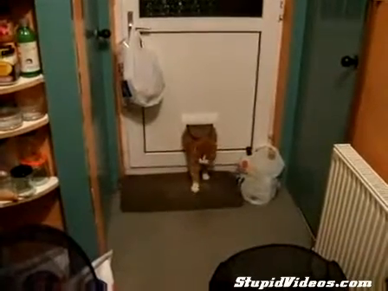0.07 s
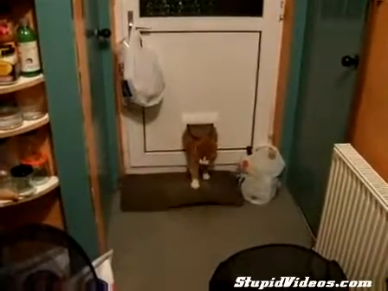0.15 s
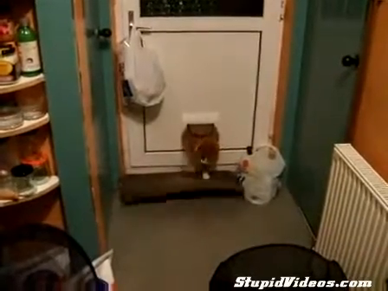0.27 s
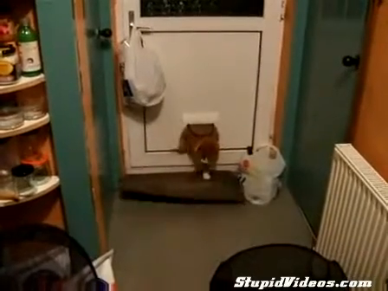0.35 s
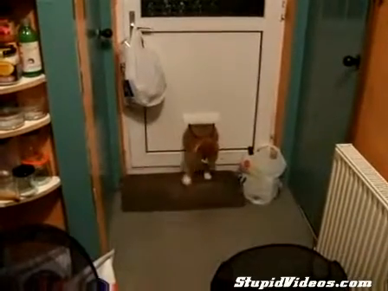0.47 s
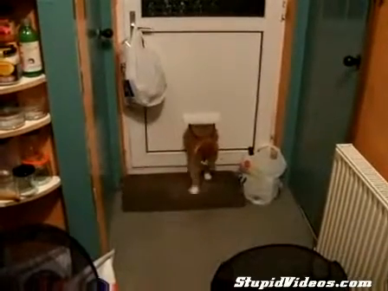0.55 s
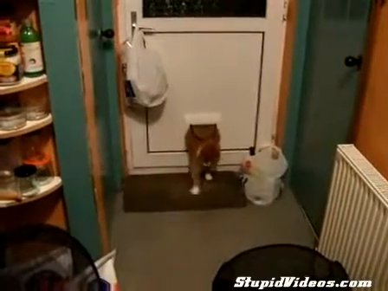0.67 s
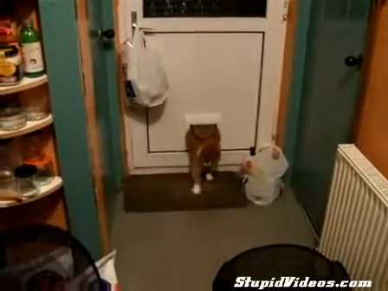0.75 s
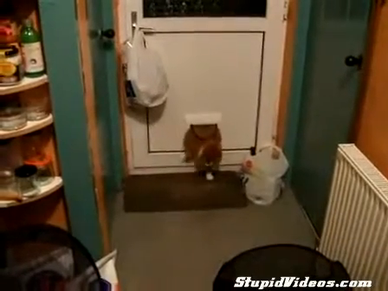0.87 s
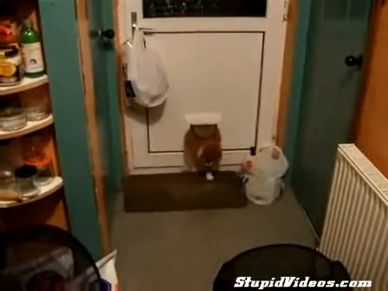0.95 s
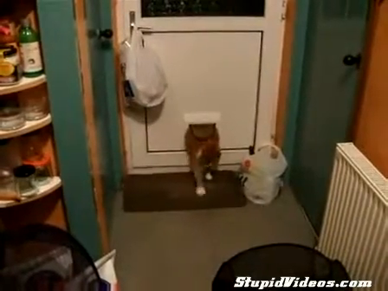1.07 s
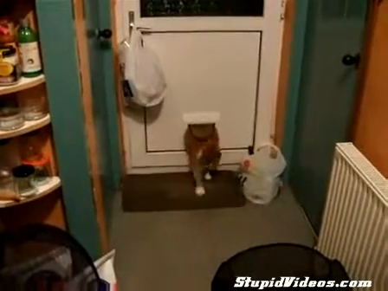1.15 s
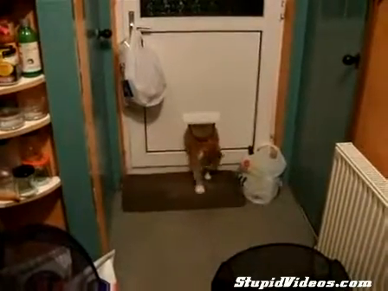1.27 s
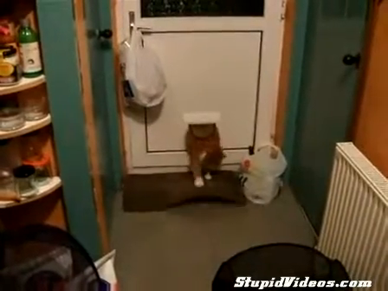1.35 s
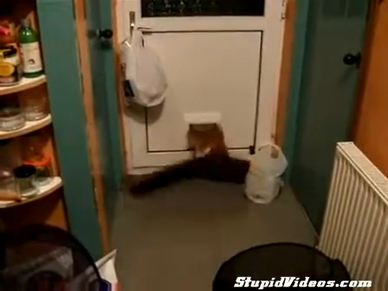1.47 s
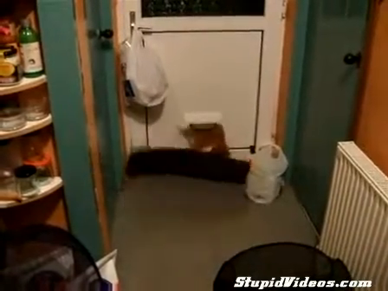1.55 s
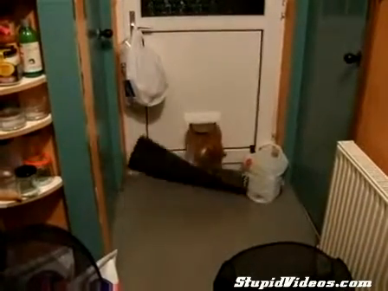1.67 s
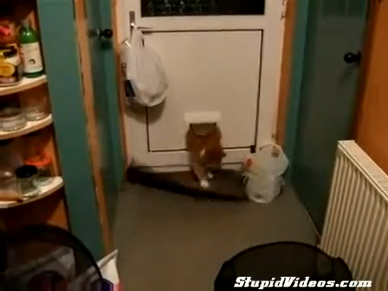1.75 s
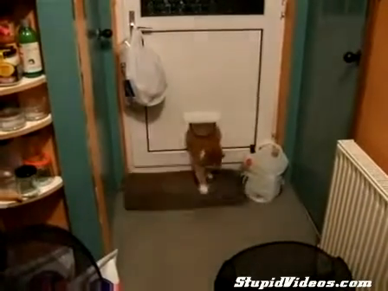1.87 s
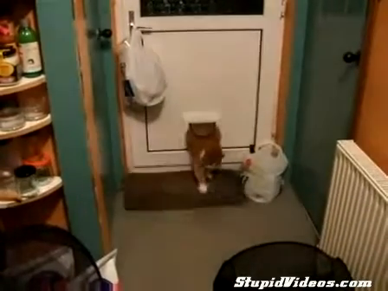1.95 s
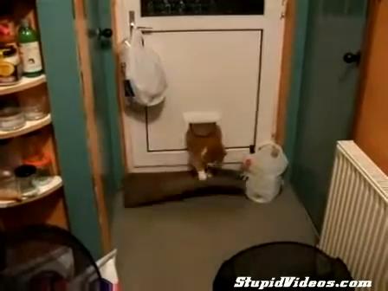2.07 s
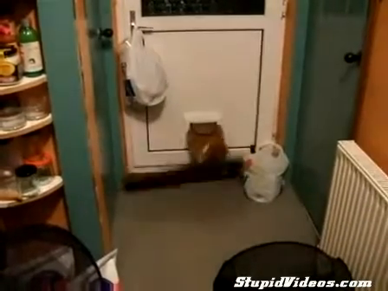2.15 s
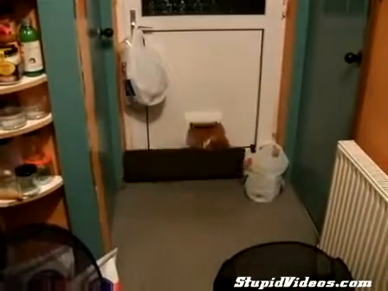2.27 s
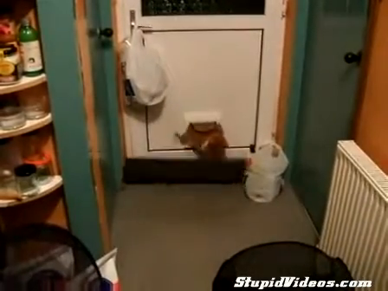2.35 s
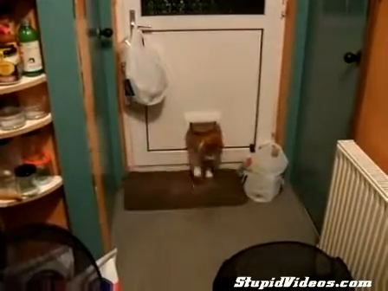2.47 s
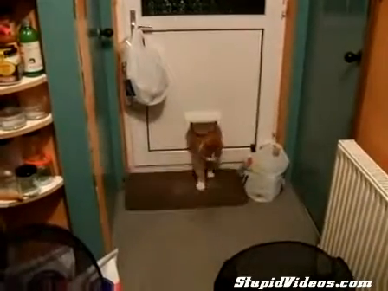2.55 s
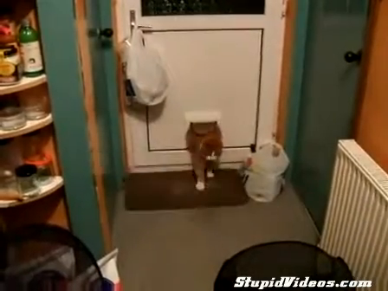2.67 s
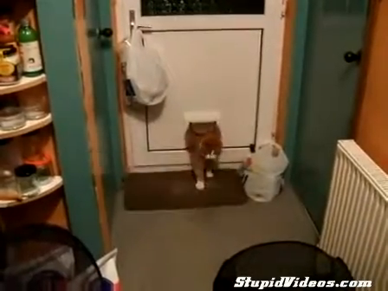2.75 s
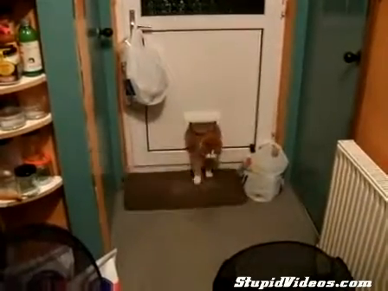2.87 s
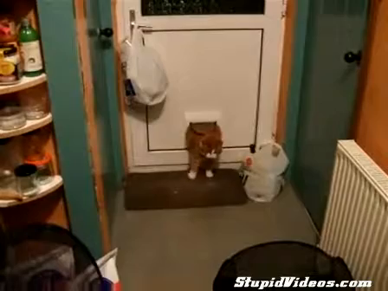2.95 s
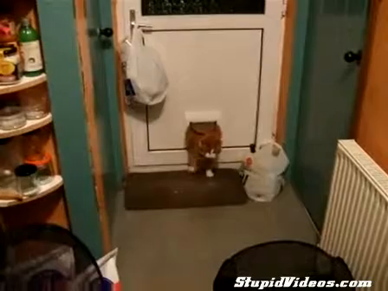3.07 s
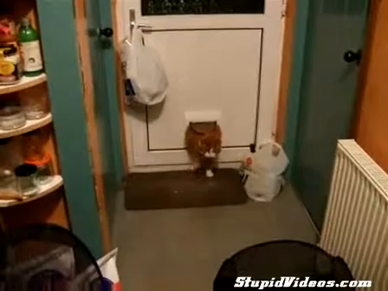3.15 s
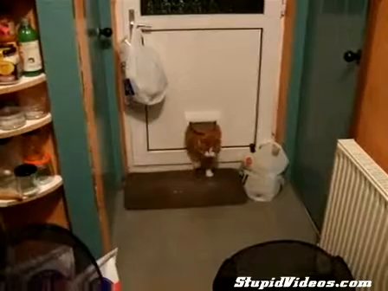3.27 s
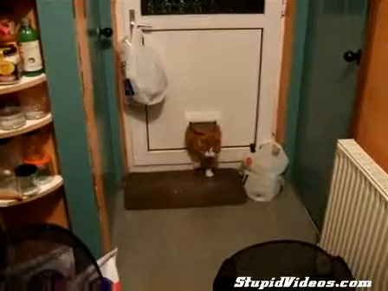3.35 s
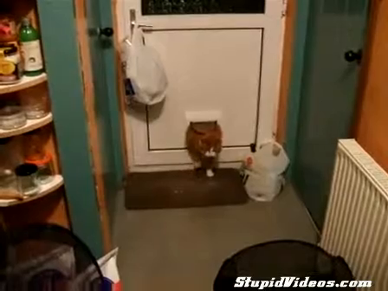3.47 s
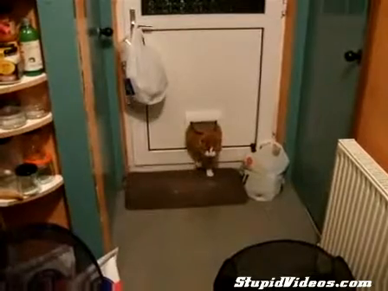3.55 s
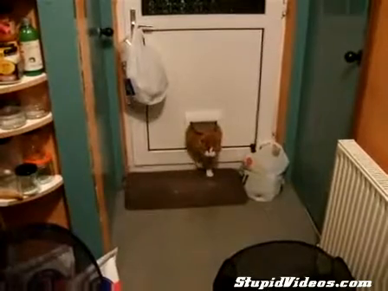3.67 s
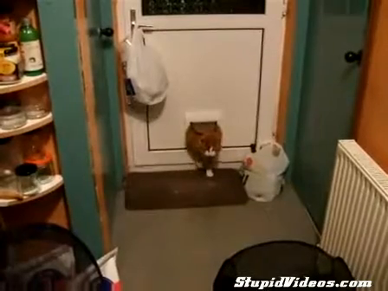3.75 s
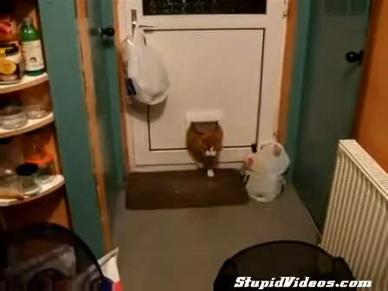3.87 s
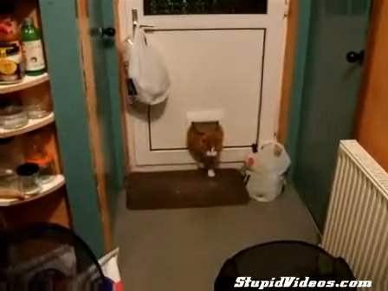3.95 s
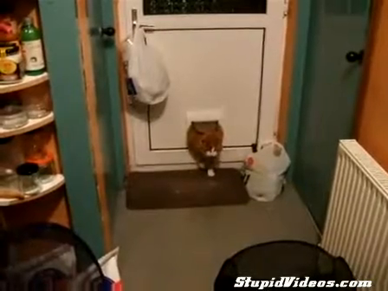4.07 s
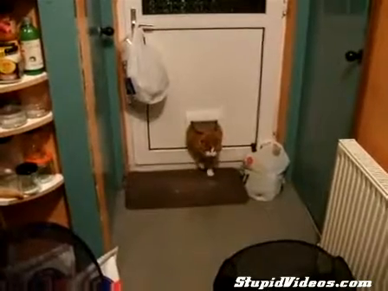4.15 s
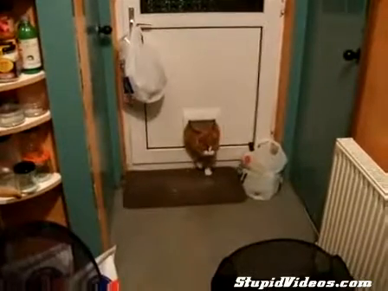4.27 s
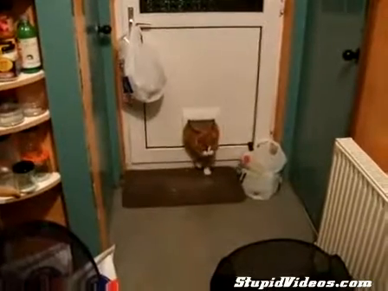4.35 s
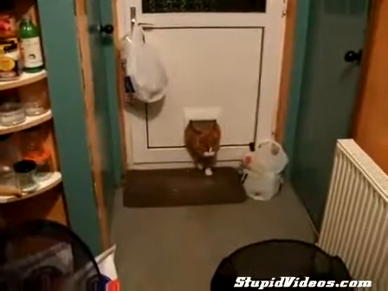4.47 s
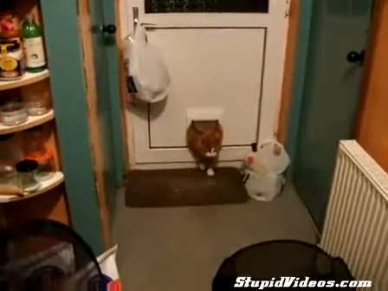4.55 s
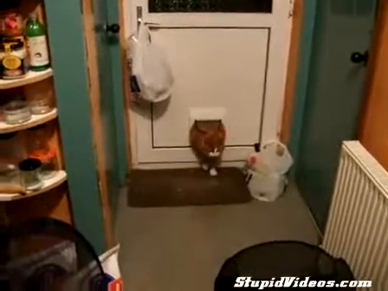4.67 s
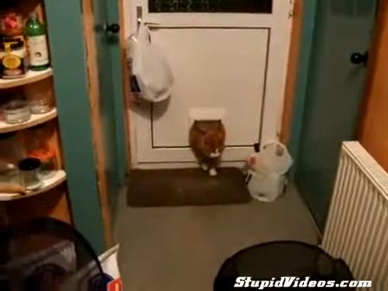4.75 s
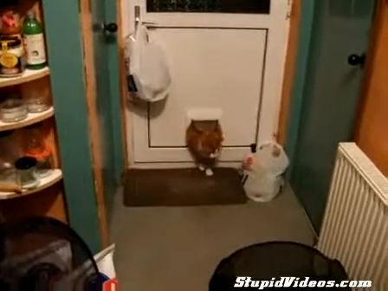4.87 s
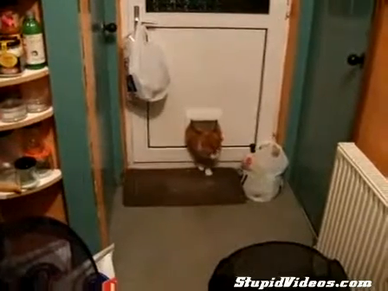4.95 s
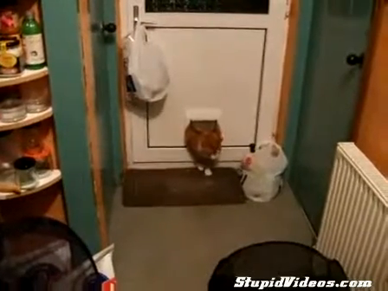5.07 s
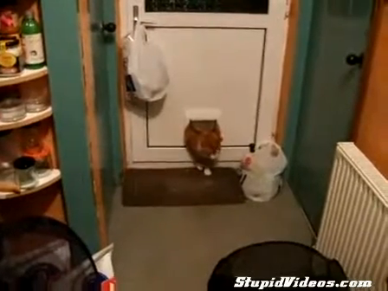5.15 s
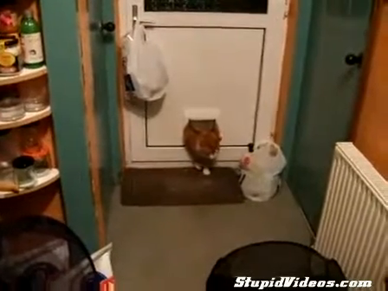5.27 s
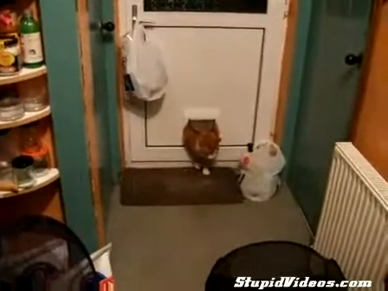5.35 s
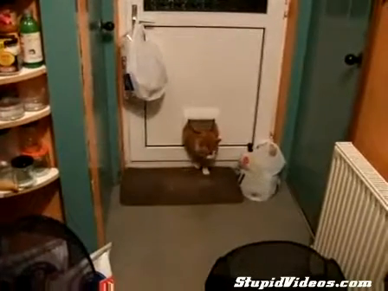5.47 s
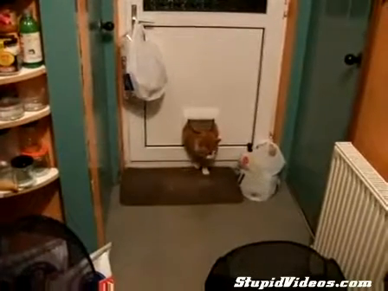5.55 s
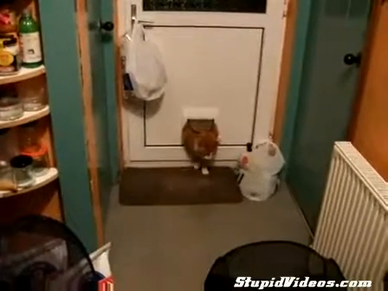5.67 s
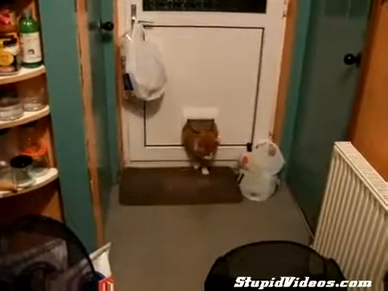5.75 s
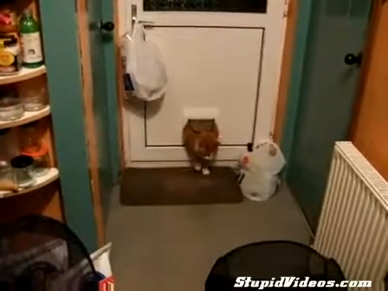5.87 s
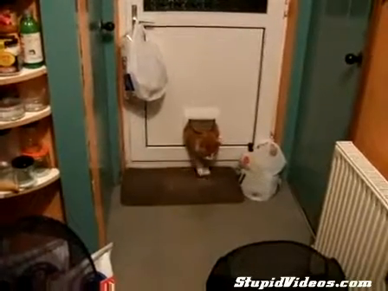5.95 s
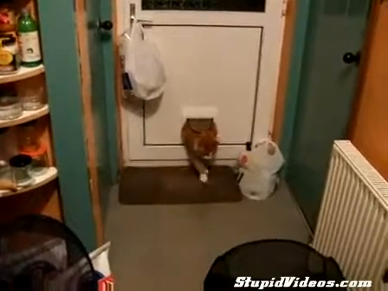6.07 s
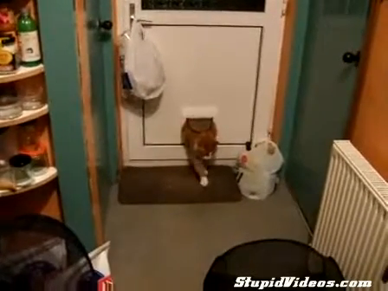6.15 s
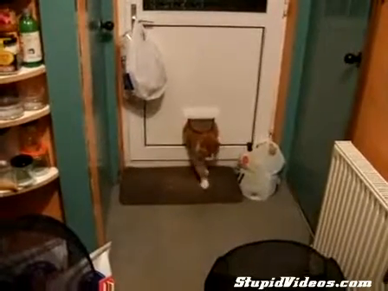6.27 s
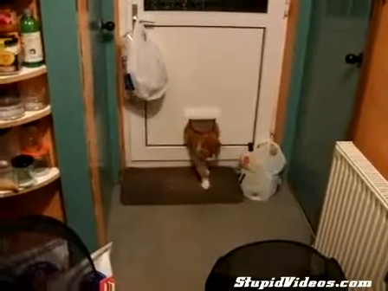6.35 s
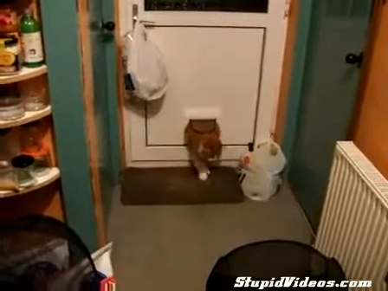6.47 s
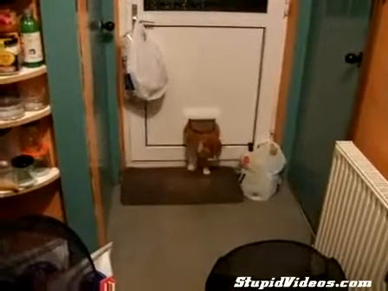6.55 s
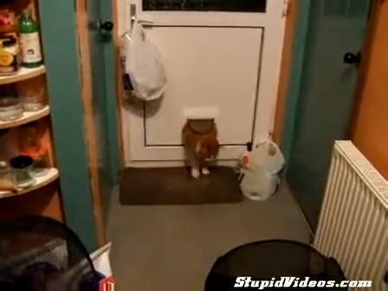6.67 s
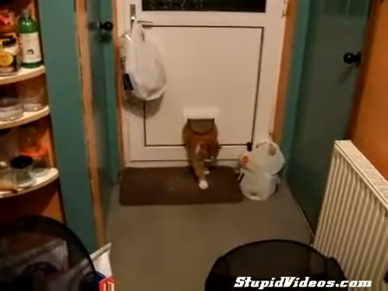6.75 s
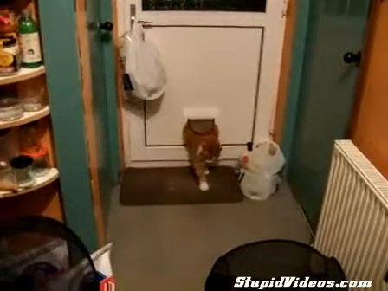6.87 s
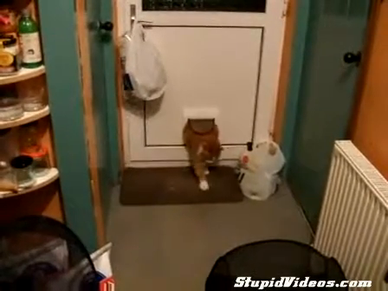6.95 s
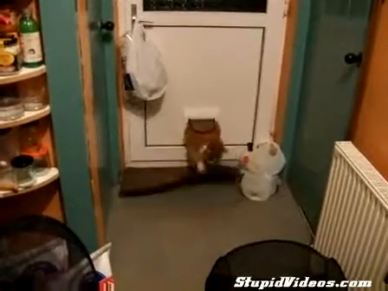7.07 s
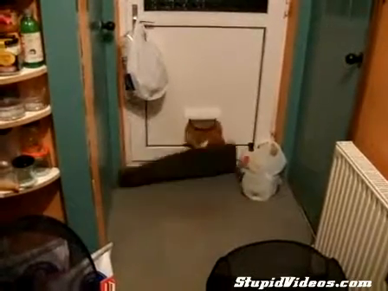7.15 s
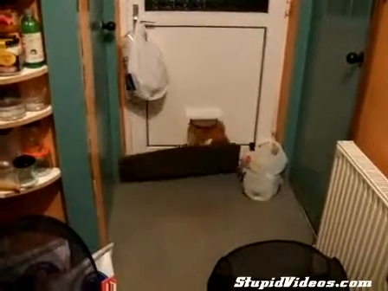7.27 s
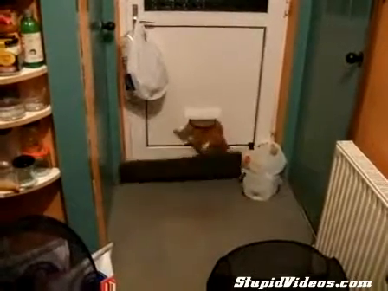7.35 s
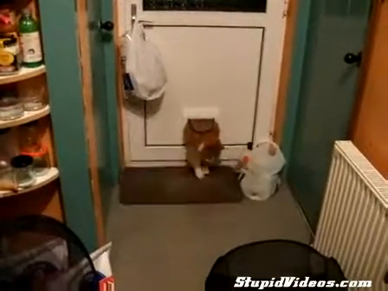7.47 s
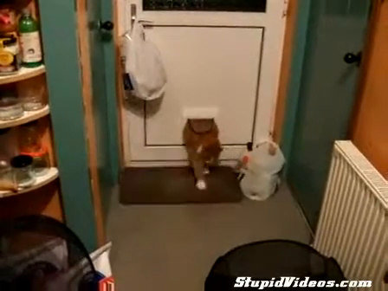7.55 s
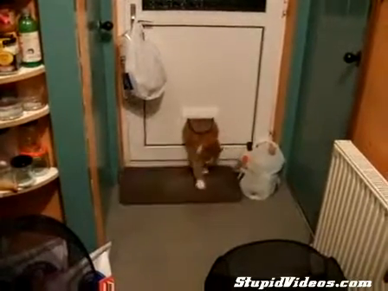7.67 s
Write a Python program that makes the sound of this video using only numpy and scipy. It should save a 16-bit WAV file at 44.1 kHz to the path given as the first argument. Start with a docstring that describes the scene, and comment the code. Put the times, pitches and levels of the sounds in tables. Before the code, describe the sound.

Hollow knocks, claw plucks and gritty scrapes come from a few metres down a narrow hallway as a cat wedged in a door flap pulls at a doormat, which slaps the floor several times. A lull follows, holding only appliance hum, microphone hiss and one faint, falling meow. Then the clawing and knocking return, and the mat lands with a last slap.

```python
"""A heavy cat is wedged in the flap of a back door, a few metres down a narrow hallway.
For three seconds its claws pluck and drag the doormat, which lifts and slaps down, and its body
knocks the flap frame and door; the flap squeaks, and one slap rings a hard part.
In a pause it meows once, faintly, over appliance hum and microphone hiss.
From 6.6 s it struggles again, ending on a last slap of the mat."""
import sys
import numpy as np
from scipy import signal
from scipy.fft import rfft, irfft
from scipy.io import wavfile
from scipy.ndimage import uniform_filter1d

SR = 44100
rng = np.random.default_rng(int(sys.argv[2]) if len(sys.argv) > 2 else 0)


def inscribe(sig):
    """Save sig as 16-bit PCM at rate SR to the path in sys.argv[1].

    A 1-D sig is mono; a 2-D sig holds one channel per row.
    Samples are clipped to [-1, 1] before scaling.
    """
    pcm = np.round(np.clip(np.atleast_2d(sig).T, -1, 1) * 32767)
    wavfile.write(sys.argv[1], SR, pcm.astype(np.int16))


N = 340011
TIME = np.arange(N) / SR
AGE = TIME[:SR // 2]  # seconds since a blow

# Mat landings. Each row: start in seconds, level in dB, weight 0-1, contact in seconds.
SLAPS = [(0.604, -23, .35, 0.0009), (1.816, -20.5, 0, 0.0039), (1.985, -20, 0, 0.0047),
         (2.638, -19, 0.66, 0.0085), (7.635, -20, 0.93, 0.003)]


def plucks():
    """Claws catch the mat and let go."""
    # Each row: start in seconds, level in dB, weight 0-1, hollow pitch in Hz.
    events = [(0.203, -34, 0.67, 690), (0.502, -24.5, .1, 840), (0.557, -25, 0.68, 1180),
              (0.921, -32, 0.85, 720), (0.934, -30, 0.86, 620), (1.037, -32.5, 0.42, 1300),
              (1.404, -41, 0.97, 810), (1.468, -29, 1, 535), (1.67, -22.5, 0.61, 1020),
              (1.692, -23, 0.4, 880), (2.464, -25, .3, 915), (2.974, -41.5, 0.63, 760),
              (6.598, -29.5, .8, 600), (6.621, -28, 0.88, 590), (7.105, -43.5, 0.73, 800),
              (7.349, -31.5, 0.4, 510)]
    # Thump, knock, clack, hiss. Each row: low and high edge in Hz, dB when light, dB added at full weight.
    colour = [(70, 250, -18.5, -5), (410, 704, -21.5, 19.5), (694, 2450, -4.5, -1.5),
              (2530, 10400, -12.5, 2)]
    return hollow_blows(events, colour, contact_s=0.0033, padding_s=0.0008, snap_db=-11.5,
                        hollow_db=2, hollow_q=4, door_db=-3.5, wet_db=2)


def knocks():
    """The cat's body hits the flap frame and door."""
    # Each row: start in seconds, level in dB, weight 0-1, hollow pitch in Hz.
    events = [(0.338, -23, 0.08, 435), (0.361, -26, 0, 413), (0.404, -21.5, 0, 384),
              (0.774, -30, 0.73, 313), (1.186, -22, 0.78, 365), (1.254, -31.5, 0.4, 332),
              (1.732, -21.5, 0.8, 407), (1.755, -24.5, 1, 298), (1.786, -26, 0.34, 306),
              (2.333, -26, 0.75, 300), (2.396, -25, .75, 280), (2.420, -16, .35, 315),
              (4.215, -42.5, .7, 330), (6.858, -28.5, 0.76, 323), (6.937, -30, 0.78, 315),
              (7.287, -18.5, 0.73, 335), (7.441, -13.5, 0.34, 328), (7.539, -20.5, 0.63, 327)]
    # Thump, knock, clack, hiss. Each row: low and high edge in Hz, dB when light, dB added at full weight.
    colour = [(75, 217, -30, 27), (220, 735, -6.5, -0.5), (710, 2500, -11.5, -3.5), (2500, 11000, -13, -14)]
    return hollow_blows(events, colour, contact_s=0.0024, padding_s=0.0014, snap_db=-13.5,
                        hollow_db=9, hollow_q=2.8, door_db=-3, wet_db=0.5)


def slaps(snap_db=-12, door_db=-5, wet_db=-1, crack_db=9, crack_s=0.00088):
    """The mat lands; the longer it takes to roll flat, the softer and duller the attack."""
    # Thump, knock, clack, hiss. Each row: low and high edge in Hz, dB when light, dB added at full weight.
    colour = [(25, 213, -17.5, 9.5), (220, 715, -11.5, 12), (693, 2770, 0, -1.5), (2480, 10200, -3.5, -2.5)]
    out = np.zeros(N)
    for start_s, level_db, weight, contact_s in SLAPS:
        bands = weighted(colour, level_db, weight)
        bands[-1, -1] += crack_db * crack_s / max(contact_s, crack_s)  # brief contact: more hiss
        add(out, start_s, blow(bands, contact_s, snap_db, door(door_db), wet_db))
    return out


def hollow_blows(events, colour, contact_s, padding_s, snap_db, hollow_db, hollow_q, door_db, wet_db):
    """Blows ring the door and a hollow whose pitch moves as the cat shifts; weight lengthens contact."""
    out = np.zeros(N)
    for start_s, level_db, weight, hz in events:
        resonances = door(door_db) + [(hz, hz / hollow_q, hollow_db)]
        bands = weighted(colour, level_db, weight)
        add(out, start_s, blow(bands, contact_s + weight * padding_s, snap_db, resonances, wet_db))
    return out


def blow(bands, contact_s, snap_db, resonances, wet_db):
    """A snap and a short crunch of contact, coloured by what is struck and by the hallway."""
    # Contact spectrum. Each row: frequency in Hz, level in dB.
    spectrum = [(25, -5), (90, -1.5), (165, 2.5), (235, -8), (320, 2), (1150, 0), (2000, -3), (5000, -7.5),
                (7400, -10.5), (8800, -19), (10200, -47.5)]
    push = AGE / max(contact_s, 1 / SR)
    force = grains(len(AGE), 9000, 0.82) * push * np.exp(-push)
    force = force / np.linalg.norm(force)
    force[0] += amp(snap_db)
    struck = through(force, body(spectrum, resonances))
    sound = through(struck, hallway(tail_db=wet_db))
    parts = [(band(sound, lo, hi), db) for lo, hi, db in bands]
    return sum(part * amp(db) / np.std(part[:SR // 30]) for part, db in parts)


def weighted(colour, level_db, weight):
    """Weight shifts a blow towards the bass. Each row out: low and high edge in Hz, level in dB."""
    return np.array([(lo, hi, level_db + light_db + np.clip(weight, 0, 1) * heavy_db)
                     for lo, hi, light_db, heavy_db in colour])


def door(coupling_db):
    """Panel and frame resonances, as strongly as a blow reaches them."""
    # Each row: frequency in Hz, width in Hz, lift in dB.
    modes = [(84, 12.4, 5), (142.5, 8.1, -2), (306, 11, -3), (533, 18, 2), (842, 78, 2), (1100, 71, -0.5),
             (1323, 43, -0.5)]
    return [(hz, width_hz, db + coupling_db) for hz, width_hz, db in modes]


def dragging(hiss_db=-1.5, rumble_db=-1, judder_db=2, swell_db=4.5, skid_rise_s=0.015):
    """The mat's backing sticks and slips over the gritty floor, when pulled and when it lands."""
    # Friction spectra. Each row: frequency in Hz, level in dB.
    hiss_spectrum = [(500, -34), (1200, -14.5), (2400, -5), (3600, -4.5), (7400, -3), (8900, -12),
                     (10200, -40.5)]
    rumble_spectrum = [(30, -20.5), (150, -1.5), (230, -7.5), (330, 0), (620, -7.5), (1050, -4.5),
                       (1700, -23.5), (4000, -44.5)]
    # Each row: start in seconds, length in seconds, level in dB, rumble offset in dB.
    pulls = [(0.33, 0.22, -37.5, -3.5), (1.508, 0.22, -32.5, -2.5), (1.848, 0.092, -36, 0),
             (2.174, 0.43, -33.5, -4), (2.757, 0.26, -52, -7.5), (7.153, 0.49, -33.5, -3.5),
             (7.196, 0.081, -24.5, -3)]
    judder = amp(judder_db * walk(70))
    hiss = through(grains(N, 2500, 0.99) * judder, body(hiss_spectrum))
    rumble = through(grains(N, 2000, 1) * judder, body(rumble_spectrum))
    out = np.zeros(N)
    for start_s, length_s, level_db, bass_db in pulls:
        room = hallway(early_db=-1, tail_db=-2.5)  # new spot, new reflections
        off_centre = np.clip(2 * (TIME - start_s) / length_s - 1, -1, 1)
        speed = stroke(TIME - start_s, length_s) * amp(level_db - swell_db * off_centre ** 2)
        out += speed * amp(hiss_db) * unit(through(hiss, room))
        out += speed * amp(rumble_db + bass_db) * unit(through(rumble, room))
    # A skid around each slap.
    room = hallway(early_db=-2, tail_db=-1)
    for layer, skid_db, decay_s in ((hiss, -7.5, 0.054), (rumble, -9.5, 0.07)):
        speed = 0
        for land_s, level_db, *_ in SLAPS:
            fade = np.maximum((land_s - TIME) / skid_rise_s, (TIME - land_s) / decay_s)
            speed += amp(level_db + skid_db) * np.exp(-fade)
        out += speed * unit(through(layer, room))
    return out


def stroke(age_s, length_s, attack_s=0.041, release_s=0.037):
    """Envelope of a pull: rise, hold, release."""
    return np.clip(age_s / attack_s, 0, 1) ** 2 * np.exp(-np.maximum(age_s - length_s, 0) / release_s)


def hardware_ring():
    """A hard part rings when the mat hits it."""
    # Each row: frequency in Hz, relative level in dB, t60 in seconds.
    modes = [(820, -0.5, 0.3), (870, -2, 0.35), (2340, -9, 0.47), (2318, 2, 0.41), (2490, 1, 0.43),
             (3320, 2.5, 0.28), (4210, -11, 0.31), (5060, -7, 0.31), (5440, -5, 0.47), (5800, -8, 0.43),
             (6260, -4, 0.24), (7250, 6, 0.11)]
    return ringing(modes, start_s=1.82, level_db=-24.5, swell_s=0.024, rough_db=6)


def flap_squeak():
    """The flap gives one rough, high note."""
    return ringing([(4340, 0.01, 0.32)], start_s=0.503, level_db=-35, swell_s=0.0036, rough_db=7.5)


def ringing(modes, start_s, level_db, swell_s, rough_db):
    """Decaying partials of a loosely held part; it chatters, so each one flutters."""
    ring = 0
    for hz, mode_db, t60_s in modes:
        flutter, sway = walk(160)[:len(AGE)], walk(60)[:len(AGE)]
        envelope = amp(mode_db + rough_db * flutter) * np.exp(-np.log(1000) * AGE / t60_s)
        ring += envelope * np.sin(2 * np.pi * hz * AGE + 0.5 * sway)
    out = np.zeros(N)
    add(out, start_s, amp(level_db) * ring * (1 - np.exp(-AGE / swell_s)))
    return out


def meow(gain_db=-1, jitter=0.0051, creak=0.039, shimmer_db=2, harmonics=7):
    """A falling voice that creaks as the pitch gives out; the mouth's resonance sweeps up and back."""
    # Each row: time in seconds, pitch in Hz, level in dB.
    contour = [(4.25, 822, -63), (4.274, 767, -50.5), (4.346, 708, -47), (4.472, 655, -48),
               (4.71, 644.3, -49.5), (4.744, 631, -37), (4.778, 587, -58), (4.788, 558, -40.5),
               (4.83, 552, -68)]
    # Throat and mouth response. Each row: frequency in Hz, gain in dB.
    tract = [(550, -10), (660, -2), (780, -8.5), (1280, 2.5), (1500, -5), (2000, -4.5), (2650, -9),
             (2850, -5), (3300, -22), (4100, -5.5), (4600, -27)]
    widest_s, closing_s, shut_db_per_harmonic = 4.525, 0.24, -4
    shut_hz, open_hz, width_hz, lift_db = 1100, 2630, 480, 9.5
    times_s, *columns = np.transpose(contour)
    pitch_hz, level_db = (np.interp(TIME, times_s, column) for column in columns)
    opening = np.cos(np.pi / 2 * np.clip((TIME - widest_s) / closing_s, -1, 1))
    centre_hz = shut_hz + (open_hz - shut_hz) * opening
    tilt_db = shut_db_per_harmonic * (1 - opening)
    slack = np.interp(pitch_hz, [560, 615], [1, 0])
    hz = pitch_hz * (1 + (jitter + creak * slack) * walk(120))
    phase = 2 * np.pi * np.cumsum(hz) / SR
    voice = power = 0
    for k in range(1, harmonics + 1):
        mouth_db = at(k * hz, tract) + lift_db / (1 + (2 * (k * hz - centre_hz) / width_hz) ** 2)
        gain = amp(mouth_db + k * tilt_db + shimmer_db * walk(20))
        voice += gain * np.sin(k * phase)
        power += gain ** 2 / 2
    gate = uniform_filter1d(1.0 * ((TIME > times_s[0]) & (TIME < times_s[-1])), SR // 50)
    voice *= amp(level_db + gain_db) * gate / np.sqrt(power)
    return 0.55 * voice + 0.45 * through(voice, hallway())


def hallway(early_db=1, early_s=0.02, tail_db=0):
    """Impulse response: direct sound, quick wall reflections, a tail whose bass lasts longest."""
    # Each row: frequency in Hz, t60 in seconds.
    decays = [(80, 0.59), (210, 0.41), (560, 0.27), (1470, 0.34), (3880, 0.34), (9000, 0.19)]
    bands_hz, t60s_s = np.transpose(decays)
    hz = np.fft.rfftfreq(len(AGE), 1 / SR)
    noise = rfft(rng.standard_normal(len(AGE)))
    tail = 0
    for share, t60_s in zip(np.eye(len(decays)), t60s_s):
        part = irfft(noise * at(hz, np.c_[bands_hz, share]), len(AGE))
        tail += part * np.exp(-np.log(1000) * AGE / t60_s)
    early = grains(len(AGE), 6000, 0.8) * np.exp(-AGE / early_s)
    impulse = (amp(early_db) * unit(early) + amp(tail_db) * unit(tail)) / np.sqrt(len(AGE))
    impulse[0] += 1
    return impulse


def background(noise_db=-51.34, waver_db=2.5):
    """Even microphone hiss and room rumble, with the wavering hum of an appliance."""
    # Each row: frequency in Hz, relative level in dB.
    spectrum = [(25, 4.5), (52, -9), (70, -8.5), (115, -5), (150, -10.5), (330, -6.5), (600, -12),
                (850, -11.5), (1600, -17), (7600, -20), (9000, -31), (10200, -54)]
    # Each row: frequency in Hz, rms level in dB.
    hum_tones = [(118.4, -69.5), (315, -70), (419.7, -60.5), (7860, -75)]
    out = amp(noise_db) * unit(through(rng.standard_normal(N), body(spectrum)))
    for hz, db in hum_tones:
        peak = np.sqrt(2) * amp(db + waver_db * walk(5))
        out += peak * np.sin(2 * np.pi * hz * TIME + 0.44 * walk(5.2))
    return out


def body(spectrum, resonances=(), size=8192):
    """Minimum-phase impulse response of a broad spectrum lifted by resonances."""
    hz = np.fft.rfftfreq(size, 1 / SR)
    gain = amp(at(hz, spectrum))
    for centre_hz, width_hz, db in resonances:
        gain *= np.hypot(1, amp(db) * 2 / np.hypot(1, 2 * (hz - centre_hz) / width_hz))
    cepstrum = irfft(np.log(gain))
    cepstrum[1:size // 2] *= 2
    cepstrum[size // 2 + 1:] = 0
    return irfft(np.exp(rfft(cepstrum)))


def grains(n, rate_hz, spread_db):
    """Random impulses of unequal size, rms 1."""
    impulses = (rng.random(n) < rate_hz / SR) * rng.standard_normal(n)
    return unit(impulses * amp(spread_db * np.minimum(rng.exponential(size=n), 4)))


def walk(rate_hz):
    """Random wander, rms 1."""
    hold = int(SR / rate_hz)
    steps = np.repeat(rng.standard_normal(N // hold + 1), hold)
    return unit(uniform_filter1d(steps, hold)[:N])


def band(x, lo_hz, hi_hz):
    """Causal band-pass."""
    return signal.sosfilt(signal.butter(3, [lo_hz, hi_hz], "band", fs=SR, output="sos"), x)


def at(hz, points):
    """Read (Hz, value) points on a log-frequency axis."""
    points_hz, values = np.transpose(points)
    return np.interp(np.log(hz + 1), np.log(points_hz), values)


def through(x, impulse):
    """Convolve, keeping the length."""
    return signal.fftconvolve(x, impulse)[:len(x)]


def add(out, start_s, x):
    """Mix x into out."""
    i = int(start_s * SR)
    out[i:i + len(x)] += x[:N - i]


def unit(x):
    """Scale to rms 1."""
    return x / np.sqrt(np.mean(x ** 2))


def amp(db):
    """Decibels to gain."""
    return 10 ** (np.asarray(db) / 20)


def scene():
    """All sources, heard by one microphone."""
    struggle = plucks() + knocks() + hardware_ring() + flap_squeak() + slaps() + dragging()
    return (struggle + meow() + background())[None]


def record(dry, ceiling=0.85, top_hz=10200):
    """The loudest peaks are softly rounded and the top of the treble is cut."""
    rounded = ceiling * np.tanh(dry / ceiling)
    return signal.sosfilt(signal.ellip(8, 0.2, 70, top_hz, fs=SR, output="sos"), rounded)


dry = scene()
out = record(dry)
inscribe(out)
```